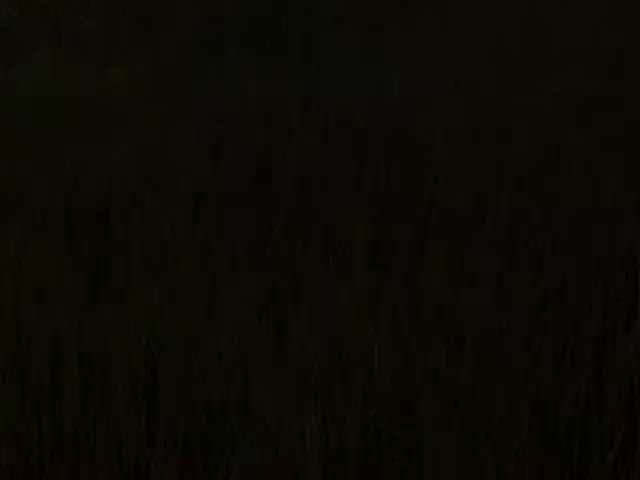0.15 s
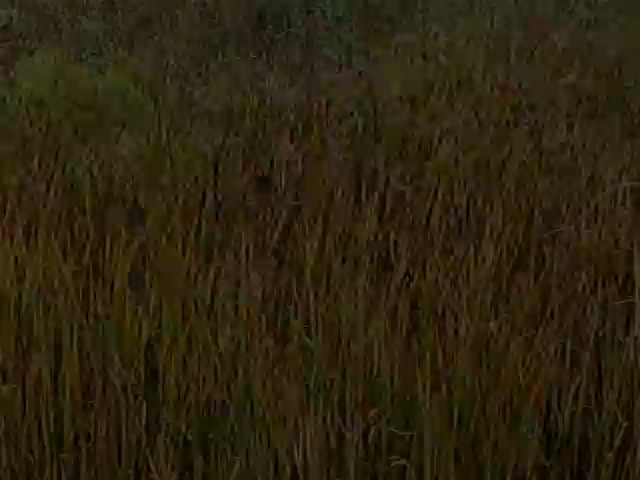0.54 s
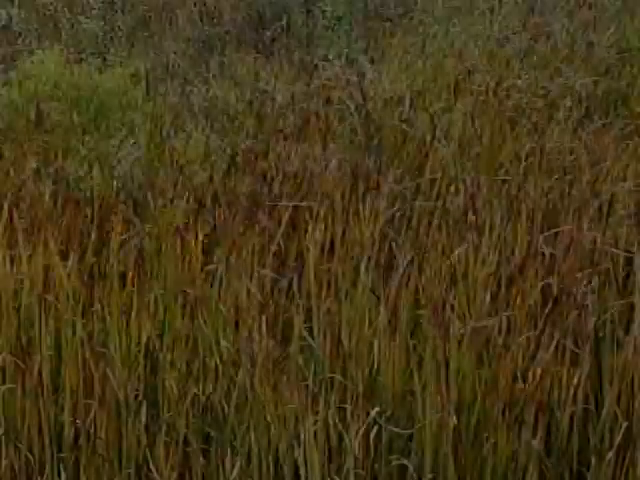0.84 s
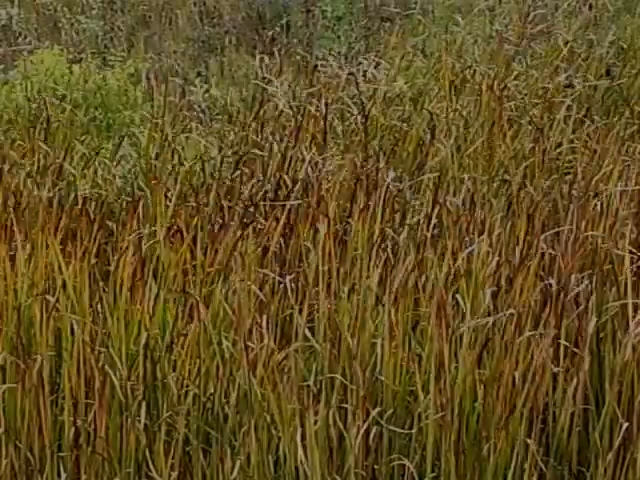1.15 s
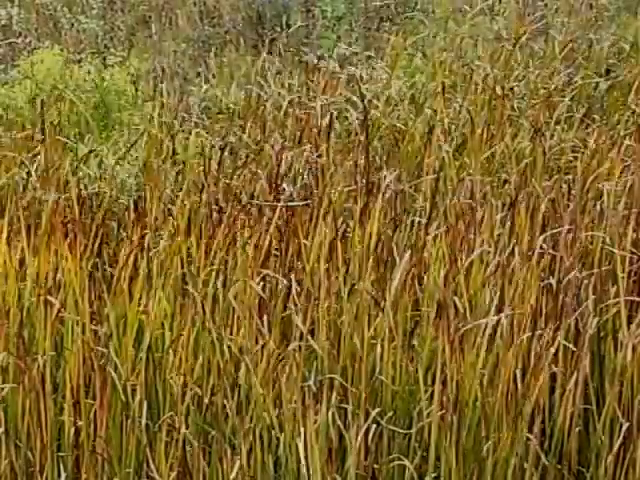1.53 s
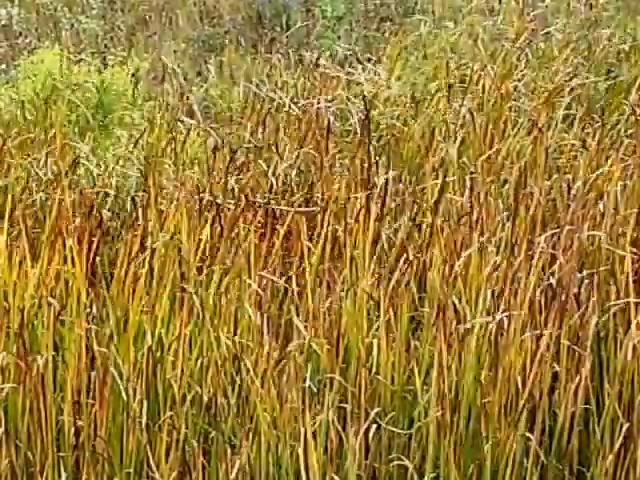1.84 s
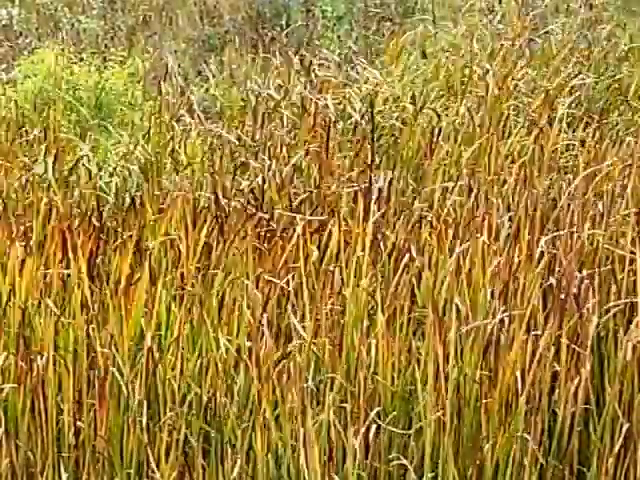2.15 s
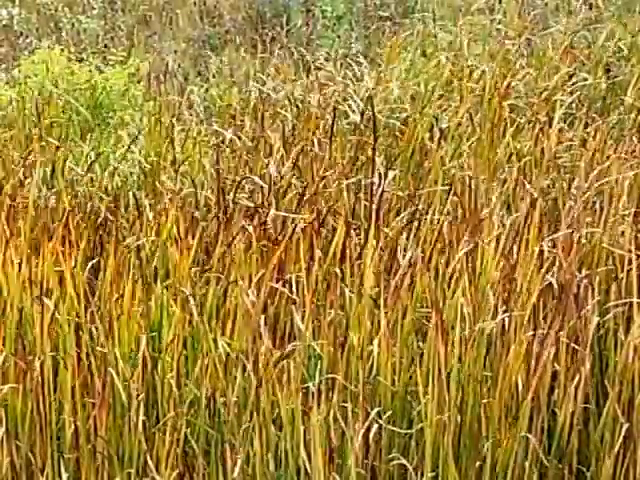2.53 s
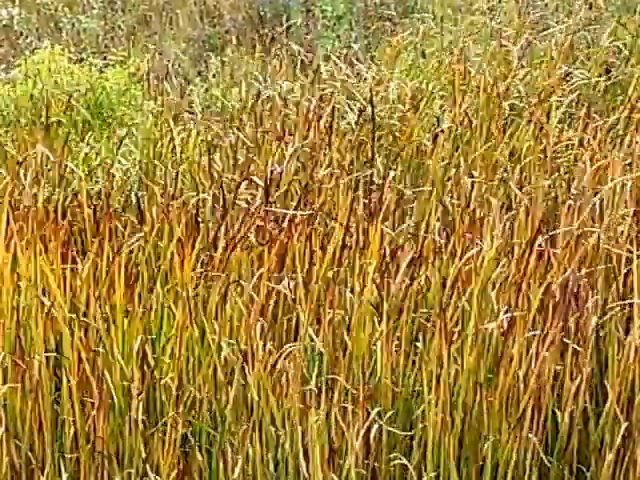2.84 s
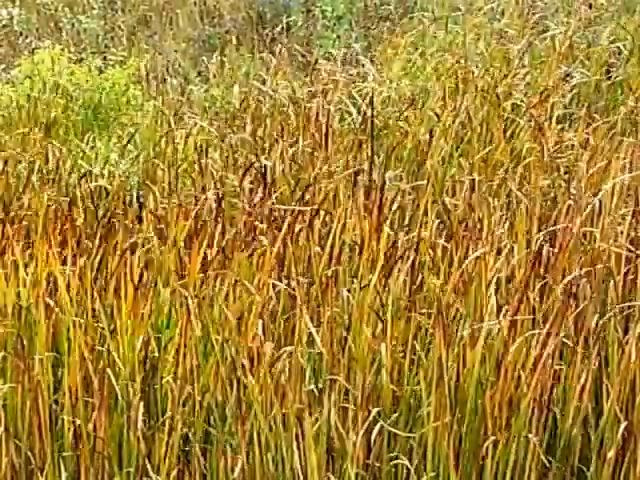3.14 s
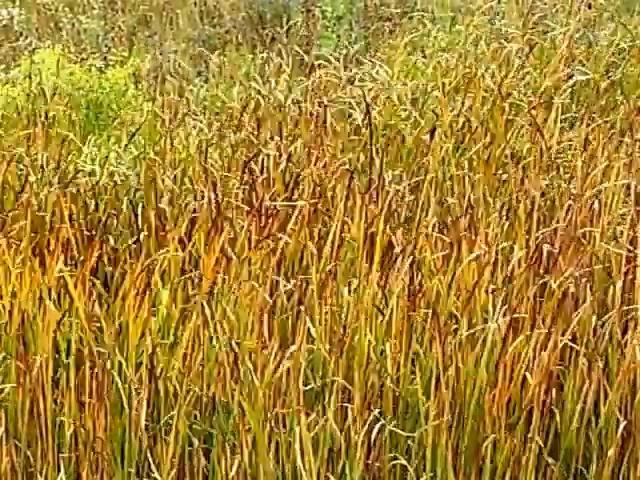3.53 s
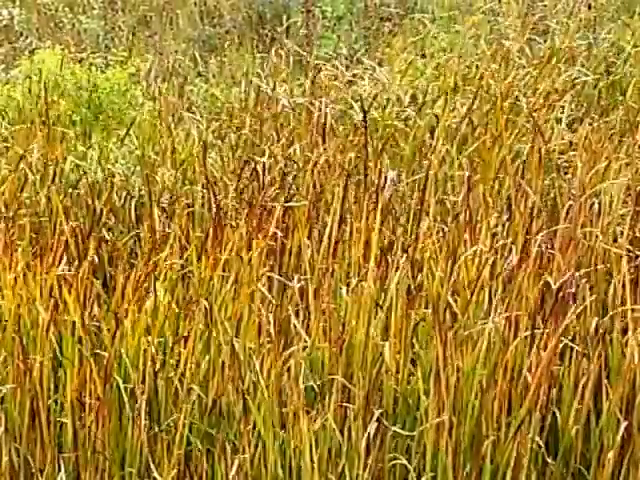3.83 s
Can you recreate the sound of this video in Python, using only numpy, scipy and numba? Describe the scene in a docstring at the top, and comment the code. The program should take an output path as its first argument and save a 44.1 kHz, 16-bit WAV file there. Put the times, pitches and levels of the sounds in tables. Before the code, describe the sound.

Distant highway traffic roars steadily, with light wind buffeting and faintly rustling grass.

```python
"""The roar of a distant highway fades in from silence, heard from a bed of tall grass in a breeze. Tyres roar
in a broad resonance that sinks as the traffic moves on; exhausts drone and one tyre sings briefly. Close by,
dry blades brush together faintly and gusts buffet a dull microphone, while a few tiny bright clicks come and go
as the level steps up."""
import sys
import numpy as np
from scipy import signal
from scipy.fft import rfft, irfft
from scipy.io import wavfile
from scipy.ndimage import uniform_filter1d
from numba import njit

SR = 44100
rng = np.random.default_rng(int(sys.argv[2]) if len(sys.argv) > 2 else 0)


def to_wav(s):
    """Save 16-bit WAV."""
    ch = np.atleast_2d(s).T  # columns
    pcm = np.round(np.clip(ch, -1, 1) * 32767)  # PCM
    wavfile.write(sys.argv[1], SR, pcm.astype(np.int16))


N = 176400


def undb(db):
    """Decibels to gain."""
    return 10 ** (np.asarray(db) / 20)


def level(x, db):
    """Scale to an rms level."""
    return x * undb(db) / np.sqrt(np.mean(x ** 2))


def noise():
    """White noise."""
    return rng.standard_normal(N)


def curve(t, table, column):
    """One column of a time table, joined by straight lines."""
    rows = np.array(table)
    return np.interp(t, rows[:, 0], rows[:, column])


def colour(x, points):
    """Shape a spectrum by (Hz, dB) points."""
    hz, rows = np.maximum(np.fft.rfftfreq(N, 1 / SR), 1), np.array(points)
    gain_db = np.interp(np.log(hz), np.log(rows[:, 0]), rows[:, 1])
    return irfft(rfft(x) * undb(gain_db), N)


def wander(rate_hz):
    """Smooth random drift with an rms of 1."""
    hold = int(SR / rate_hz)
    steps = np.repeat(rng.standard_normal(N // hold + 2), hold)
    return level(uniform_filter1d(uniform_filter1d(steps, hold), hold)[:N], 0)


@njit
def resonate(x, hz, width_hz):
    """State-variable band-pass with a moving centre."""
    y, band_state, low_state = np.empty(len(x)), 0., 0.
    for i in range(len(x)):
        g, damping = np.tan(np.pi * hz[i] / SR), width_hz / hz[i]
        v = (band_state + g * (x[i] - low_state)) / (1 + g * (g + damping))
        band_state, low_state = 2 * v - band_state, low_state + 2 * g * v
        y[i] = damping * v
    return y


def band(x, hz, width_hz):
    """A resonance applied twice, for steep sides."""
    centre = hz * np.ones(N)
    return resonate(resonate(x, centre, float(width_hz)), centre, float(width_hz))


def lowpass(x, hz):
    """Steep low-pass."""
    return signal.sosfilt(signal.ellip(8, .2, 70, hz, fs=SR, output="sos"), x)


def swell(t, peak_s, half_width_s):
    """A bell-shaped rise and fall."""
    return np.exp(-((t - peak_s) / half_width_s) ** 2)


# The faint hiss floor: freq_hz, gain_db
HISS_SPECTRUM = [(1000, 0.5), (5000, -3), (9000, -4), (15000, -5.5)]

def faint_hiss():
    """A faint steady hiss under the scene."""
    return level(colour(noise(), HISS_SPECTRUM), -94.5)


# Clicks of the stepping level control: start_s, impulse_db
STEP_CLICKS = [(.445, -40.5), (.828, -48), (.905, -36), (.982, -48), (1.058, -51), (2.055, -25)]

def step_clicks():
    """Single impulses through a wide band make tiny bright clicks."""
    impulses = np.zeros(N)
    for start_s, impulse_db in STEP_CLICKS:
        impulses[int(start_s * SR)] = undb(impulse_db)
    return band(impulses, hz=4200, width_hz=14000)


# Dry blades around the microphone: freq_hz, gain_db
BLADE_SPECTRUM = [(500, -28.5), (1500, -2), (2300, -4), (2800, -3.5), (3450, -6.5), (3950, -15.5),
                  (4450, -20.5), (4900, -32)]
# Their rustle rising with the breeze: time_s, level_db
RUSTLE_LEVELS = [(0, -69.5), (1.5, -61), (2.3, -50.5), (2.8, -55), (3.4, -51.5), (3.85, -48.5), (4, -48)]

def grass(t, contacts_per_s=4200):
    """Dry blades brush each other in a dense patter of tiny contacts."""
    contacts = (rng.random(N) < contacts_per_s / SR) * noise()
    return level(colour(contacts, BLADE_SPECTRUM), curve(t, RUSTLE_LEVELS, 1) + 2.1 * wander(22))


# Hard eddies right on the microphone: centre_s, level_db, half_width_s
HARD_EDDIES = [(0.777, -17.5, 0.001), (.787, -15.5, .0015), (0.859, -18, 0.0015), (0.909, -14, 0.0034)]

def wind_thumps(t):
    """Each hard eddy pushes on the microphone, then sucks."""
    return sum(undb(db) * 2 * (centre_s - t) / half_width_s * swell(t, centre_s, half_width_s)
               for centre_s, db, half_width_s in HARD_EDDIES)


# Gusts striking the microphone: start_s, length_s, rumble_db, flutter_db
MIC_GUSTS = [(0.353, 0.068, -23.5, -30), (0.713, 0.2, -27.5, -32), (1.962, 0.11, -37.5, -56),
             (2.51, 0.11, -35, -38.5), (2.74, .13, -32, -36), (2.98, 0.085, -31, -39.5)]
# Rumble of the large eddies: freq_hz, gain_db
RUMBLE_SPECTRUM = [(10, -9.5), (30, -3), (80, 2.5), (130, -8), (260, -20.5), (700, -43), (2000, -72.5)]
# Fine flutter within a gust: freq_hz, gain_db
FLUTTER_SPECTRUM = [(30, -14), (100, -2), (230, 2), (330, -9), (450, -16), (700, -33.5), (2000, -61)]

def wind_buffets(t, breeze_db=-38, attack_s=.03, release_s=.025):
    """Eddies rumble lightly on the microphone; short gusts push harder and add a finer flutter."""
    rumble_gain, flutter_gain = undb(breeze_db + 2.1 * wander(11)), 0
    for start_s, length_s, rumble_db, flutter_db in MIC_GUSTS:
        rise = np.clip((t - start_s) / attack_s, 0, 1)
        gust = rise * np.exp(-np.maximum(t - start_s - length_s, 0) / release_s)
        rumble_gain = np.hypot(rumble_gain, undb(rumble_db) * gust)
        flutter_gain += undb(flutter_db) * gust
    churn = undb(1.2 * wander(120))
    rumble = level(colour(noise() * churn, RUMBLE_SPECTRUM), 0)
    flutter = level(colour(noise() * churn, FLUTTER_SPECTRUM), 0)
    return rumble_gain * rumble + flutter_gain * flutter


def singing_tyre(t, pitch_hz=563.6):
    """A thin tread tone, barely there until it carries over from the road for a moment."""
    phase = 2 * np.pi * np.cumsum(pitch_hz * (1 + .0035 * wander(25))) / SR
    tone = level(np.sin(phase) * undb(1.2 * wander(20)), -39.4)
    return tone * (swell(t, peak_s=3.07, half_width_s=.115) + .08)


# Engines out on the highway: time_s, firing_hz, level_db
ENGINE_DRONE = [(0, 59.04, -38.5), (1.2, 60, -39), (1.36, 59.8, -40), (1.49, 62, -29.5), (1.62, 58.1, -49),
                (1.9, 60.65, -36.5), (2.42, 59.16, -39.5), (2.57, 59.5, -36.5), (2.92, 57.5, -39.5),
                (3.12, 54.97, -34), (3.42, 54, -42.5), (4, 59.3, -43.5)]

def engines(t):
    """A low drone and one lorry's exhaust note, smeared by distance into narrow wavering bands."""
    firing_hz = curve(t, ENGINE_DRONE, 1) * (1 + .066 * wander(25))
    phase = 2 * np.pi * np.cumsum(firing_hz) / SR
    lorry = level(band(noise(), hz=130, width_hz=33), -41) * swell(t, peak_s=2.8, half_width_s=.35)
    drone = level(np.sin(phase) * undb(2.1 * wander(20)), curve(t, ENGINE_DRONE, 2))
    return drone + lorry


# Steady road noise as it reaches the grass: freq_hz, gain_db
ROAD_SPECTRUM = [(20, -22.5), (70, -1.5), (130, 2.5), (165, -3), (210, 0.5), (320, -3.5), (440, -5),
                 (560, -4.5), (740, -3.5), (1000, 0.5), (1200, 0), (1550, -4.5), (2000, -8.5), (2400, -14),
                 (2750, -16), (3000, -20), (3450, -24), (3950, -41), (4450, -41.5), (4900, -48)]
# Tyre roar of the far traffic: time_s, tread_db, tread_hz, body_db
TYRE_ROAR = [(0, -40.5, 1020, -55.5), (1.15, -43, 984, -45.5), (1.8, -40, 950, -42), (2.3, -38, 928, -44),
             (2.9, -40.5, 895, -40.5), (3.45, -38.5, 850, -43), (3.85, -35.5, 875, -38.5),
             (4, -36.5, 891, -46)]
# Treble lost through air and grass on the way to the microphone: freq_hz, gain_db
DISTANCE_LOSS = [(1800, 0.5), (3000, -4), (3600, -5), (4000, -18), (4900, -25.5)]

def highway(t):
    """Over steady road noise, tread resonance, its low body and a nearer vehicle waver in moving air."""
    road = level(colour(noise(), ROAD_SPECTRUM), -32.5)
    tread_hz = curve(t, TYRE_ROAR, 2) * (1 + .021 * wander(7.1))
    tread = level(band(noise(), tread_hz, width_hz=210), curve(t, TYRE_ROAR, 1) + 1.1 * wander(14))
    body = level(band(noise(), hz=583, width_hz=325), curve(t, TYRE_ROAR, 3) + 1.2 * wander(14))
    nearer_tyres = level(band(noise(), hz=1300, width_hz=720), -39 + 1.1 * wander(28))
    nearer_tyres *= swell(t, peak_s=1.45, half_width_s=1.15)
    return road + colour(tread + body + nearer_tyres, DISTANCE_LOSS)


def scene():
    """One microphone in the grass: traffic far off, wind and blades close by."""
    t = np.arange(N) / SR
    traffic = highway(t) + engines(t) + singing_tyre(t)
    return (traffic + wind_buffets(t) + wind_thumps(t) + grass(t))[None]


def record(dry):
    """A dull microphone with faint hiss and ticks; the level fades up in small steps."""
    t = np.arange(N) / SR
    open_s, step_s, ramp_s = .138, .0767, .004
    fade_start_s, fade_length_s = .1, 1.475
    stepped_s = open_s + step_s * (np.floor((t - open_s) / step_s) + .5)
    progress = np.clip((stepped_s - fade_start_s) / fade_length_s, 0, 1)
    is_open = t > open_s
    fade = uniform_filter1d(np.sin(np.pi / 2 * progress) ** 2.02 * is_open, int(ramp_s * SR))
    dull = lowpass(dry, hz=4750)
    return lowpass(dull * fade + faint_hiss() * is_open + step_clicks(), hz=15800)


dry = scene()
out = record(dry)
to_wav(out)
```